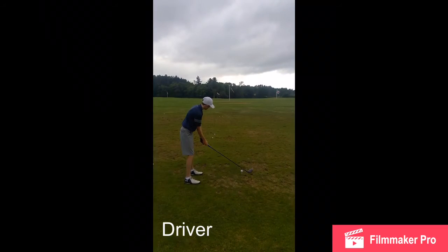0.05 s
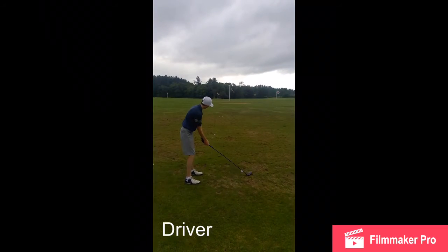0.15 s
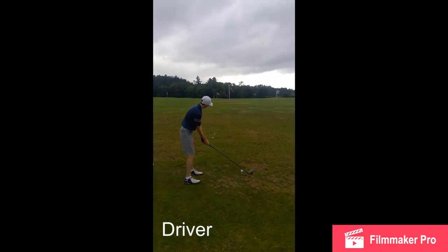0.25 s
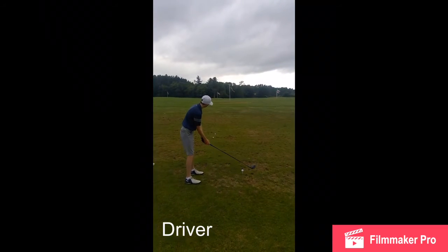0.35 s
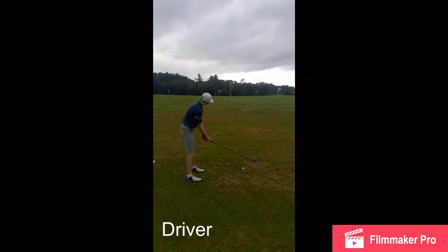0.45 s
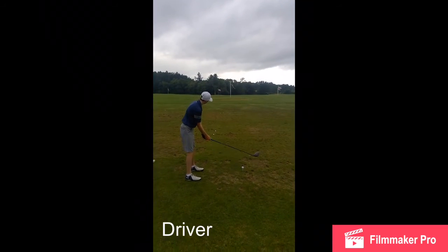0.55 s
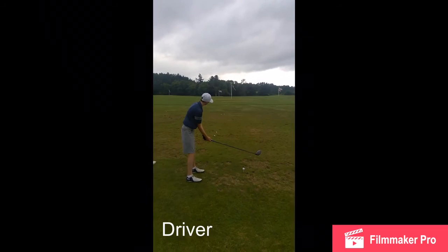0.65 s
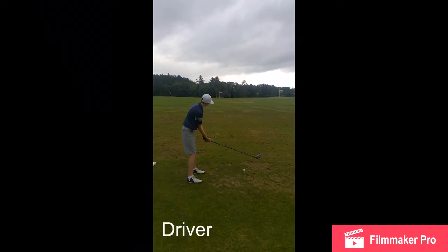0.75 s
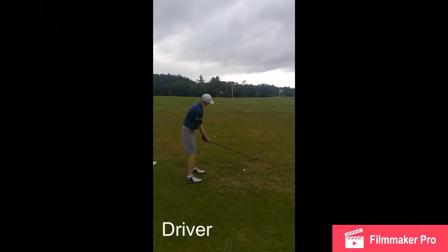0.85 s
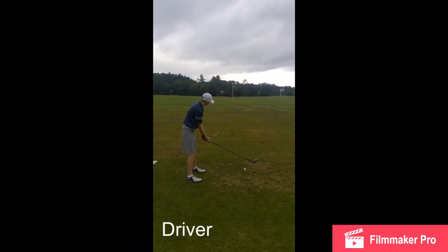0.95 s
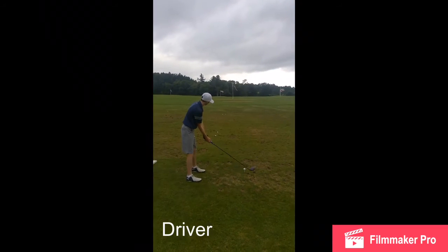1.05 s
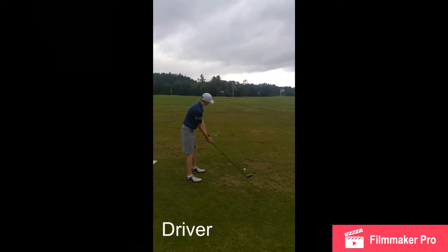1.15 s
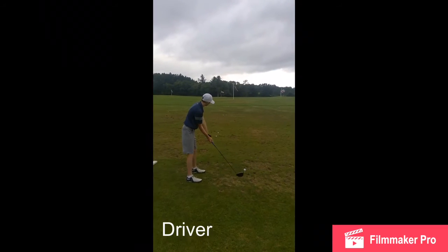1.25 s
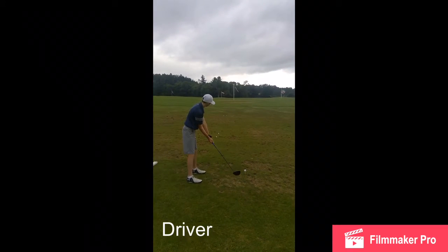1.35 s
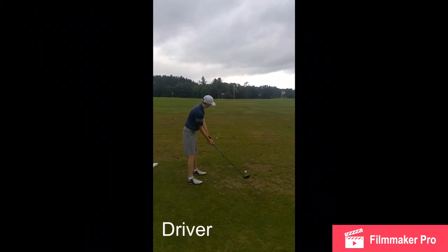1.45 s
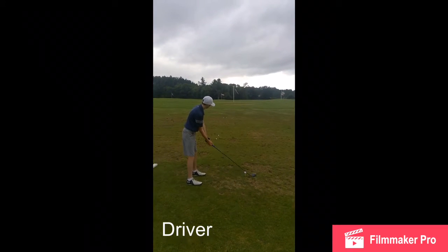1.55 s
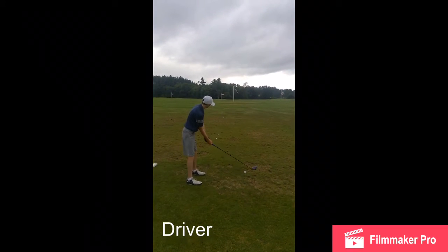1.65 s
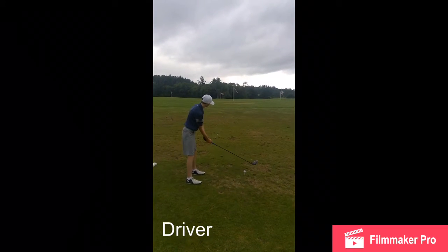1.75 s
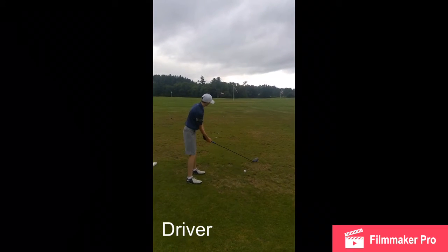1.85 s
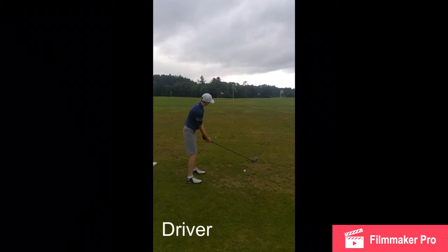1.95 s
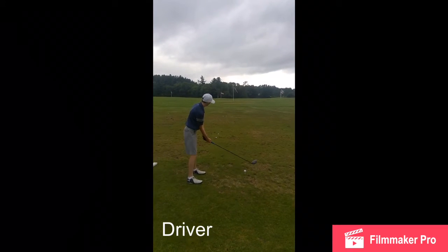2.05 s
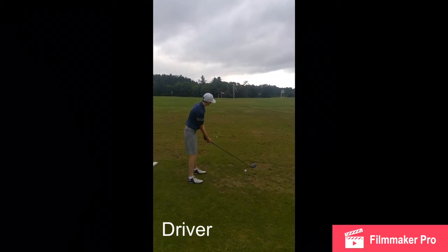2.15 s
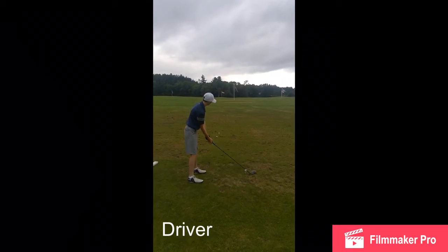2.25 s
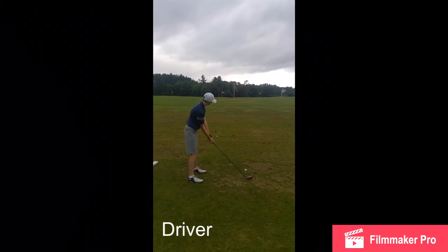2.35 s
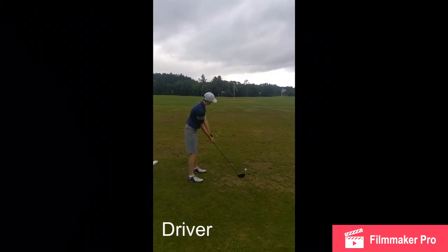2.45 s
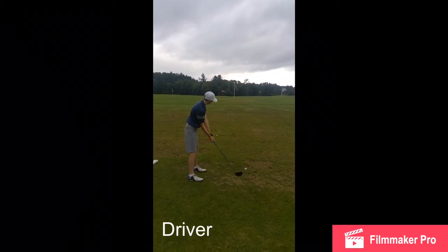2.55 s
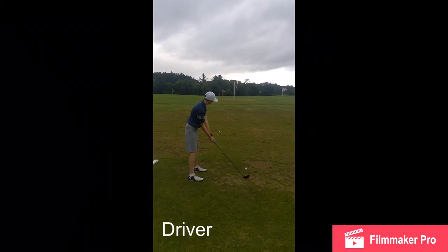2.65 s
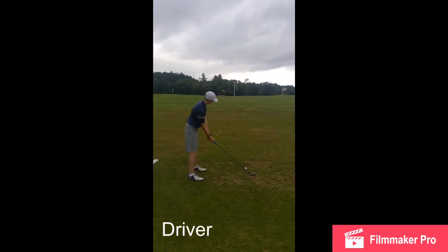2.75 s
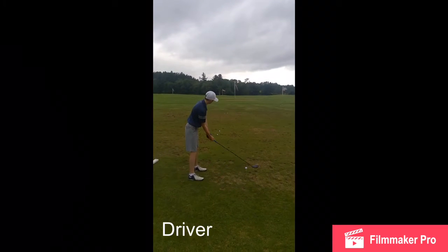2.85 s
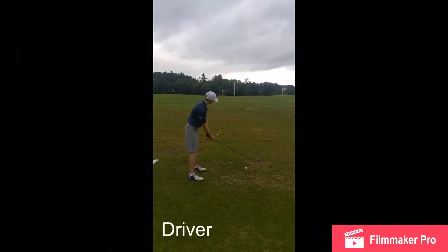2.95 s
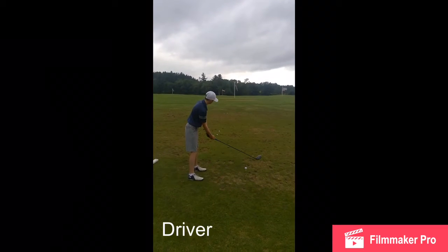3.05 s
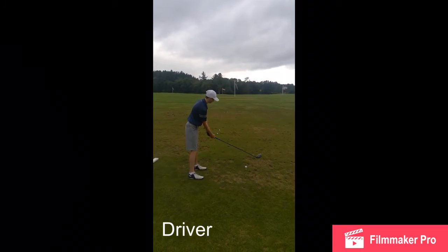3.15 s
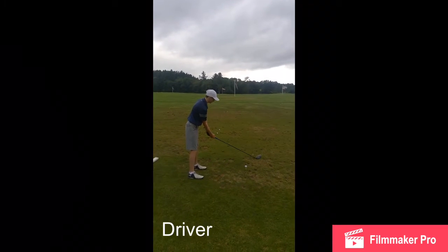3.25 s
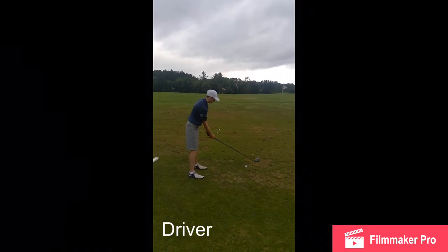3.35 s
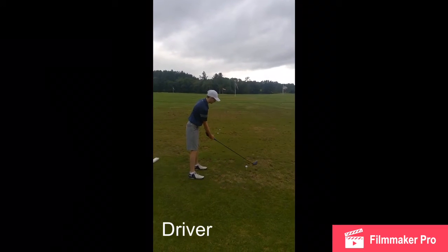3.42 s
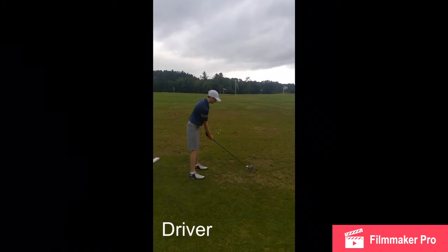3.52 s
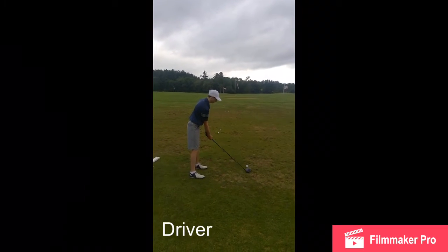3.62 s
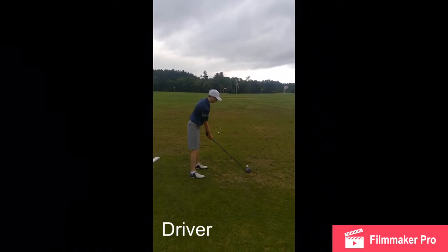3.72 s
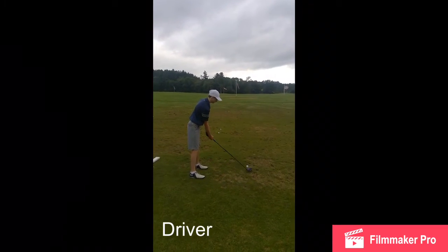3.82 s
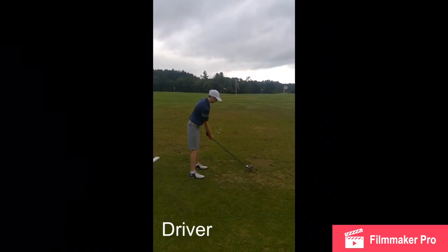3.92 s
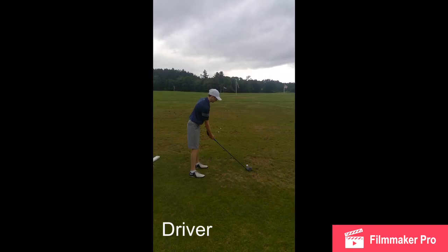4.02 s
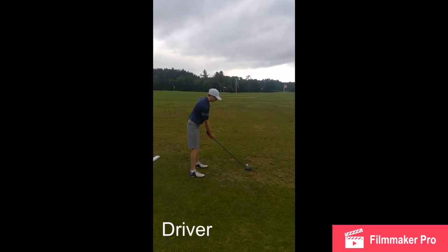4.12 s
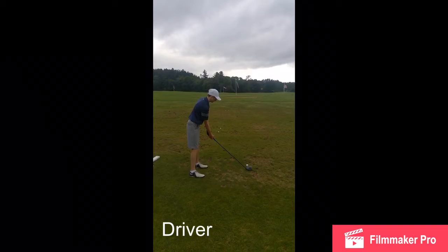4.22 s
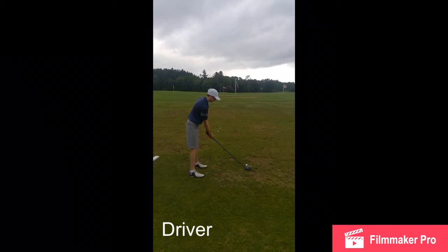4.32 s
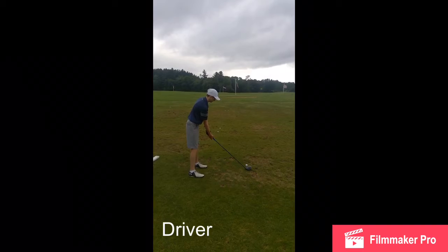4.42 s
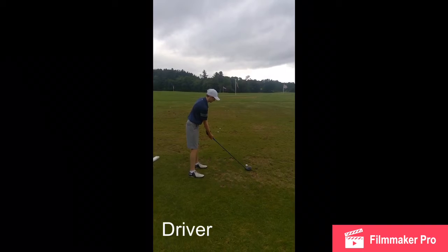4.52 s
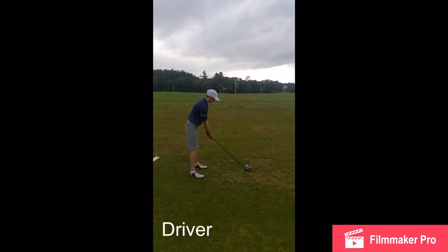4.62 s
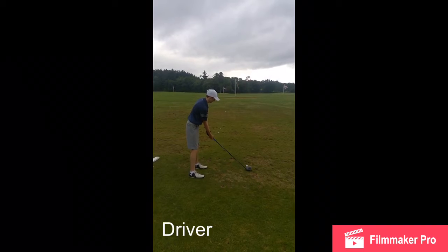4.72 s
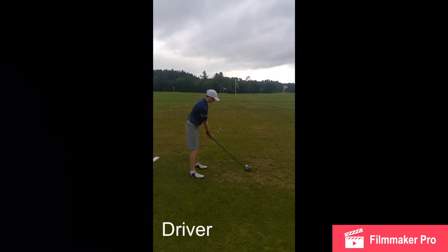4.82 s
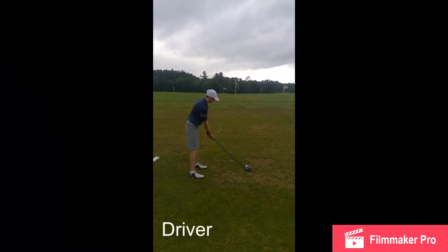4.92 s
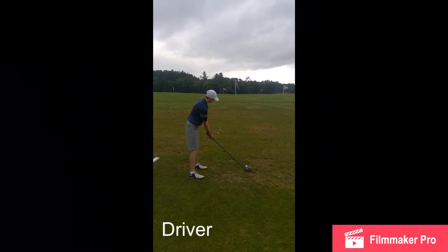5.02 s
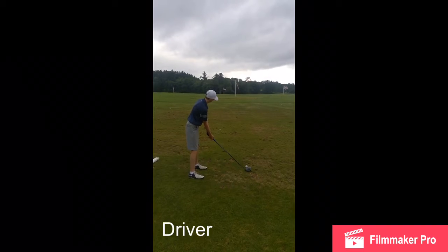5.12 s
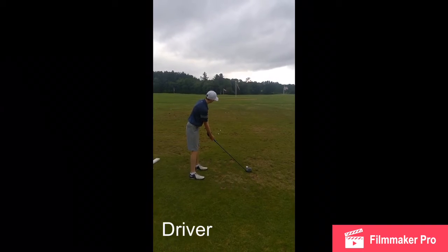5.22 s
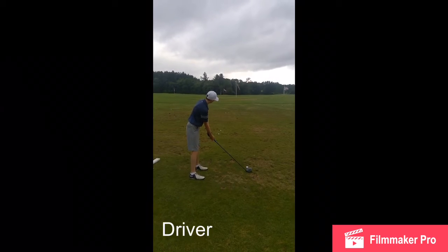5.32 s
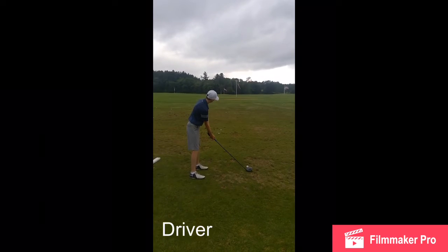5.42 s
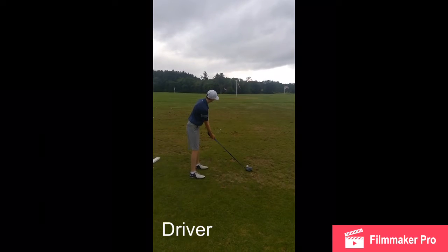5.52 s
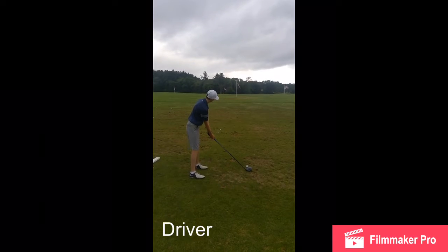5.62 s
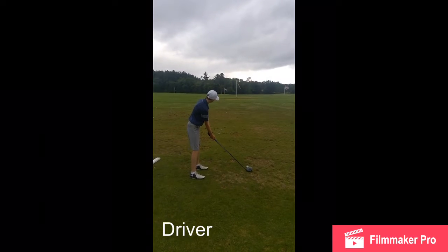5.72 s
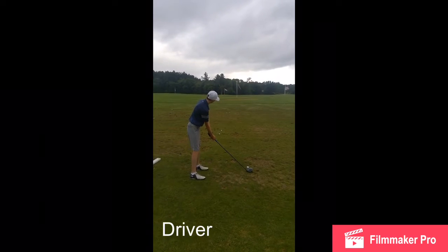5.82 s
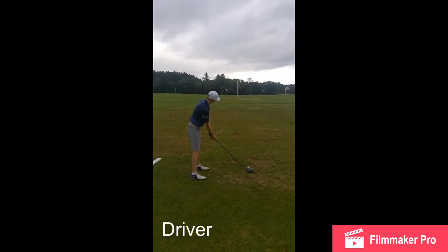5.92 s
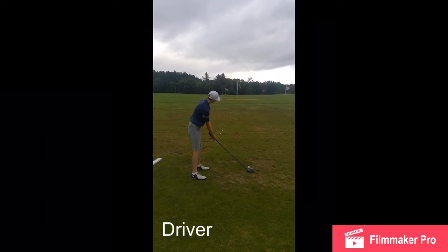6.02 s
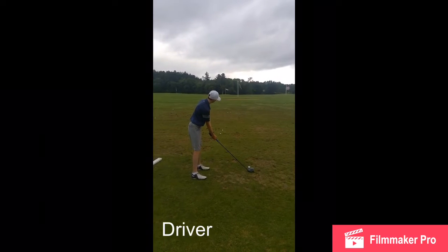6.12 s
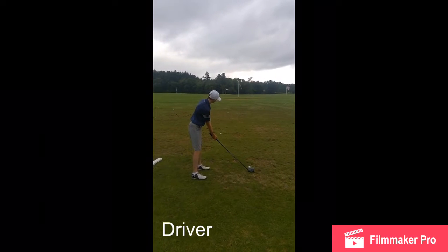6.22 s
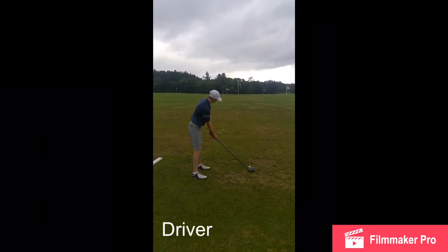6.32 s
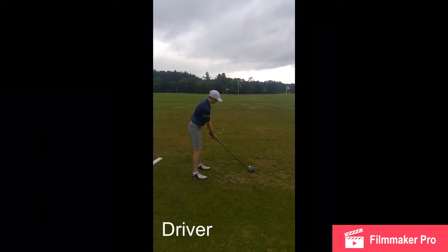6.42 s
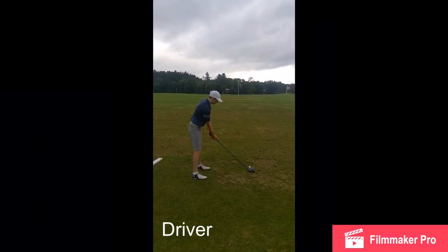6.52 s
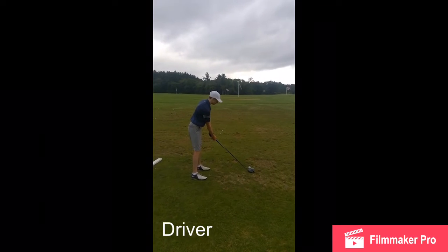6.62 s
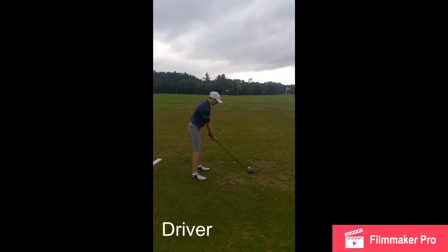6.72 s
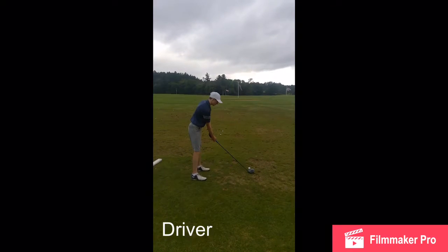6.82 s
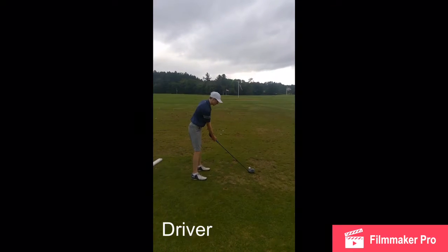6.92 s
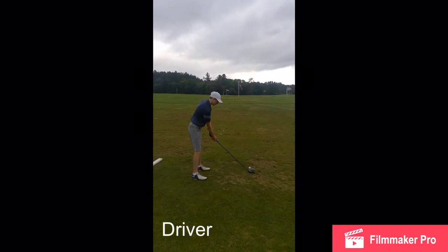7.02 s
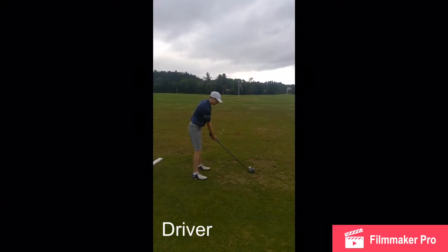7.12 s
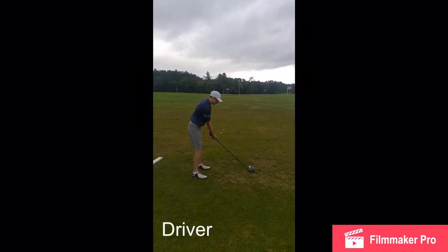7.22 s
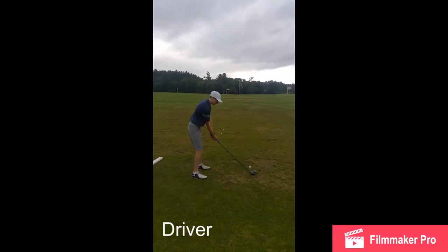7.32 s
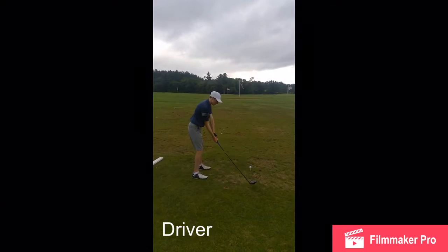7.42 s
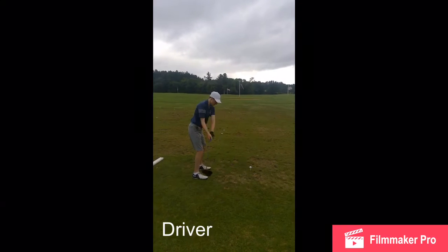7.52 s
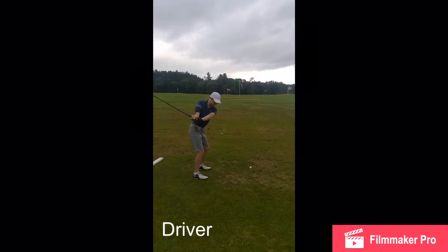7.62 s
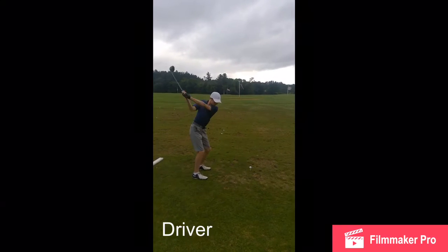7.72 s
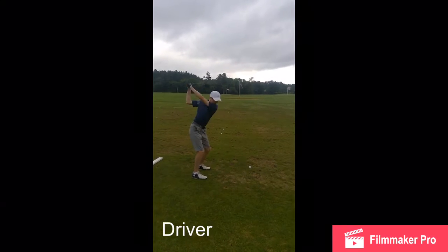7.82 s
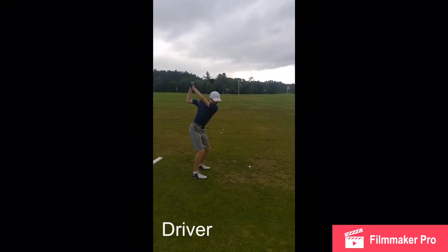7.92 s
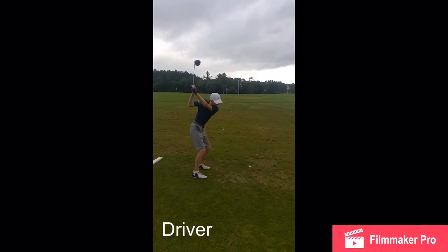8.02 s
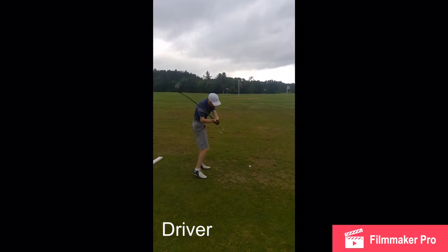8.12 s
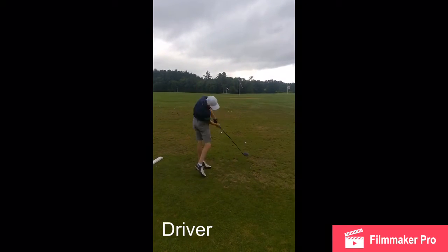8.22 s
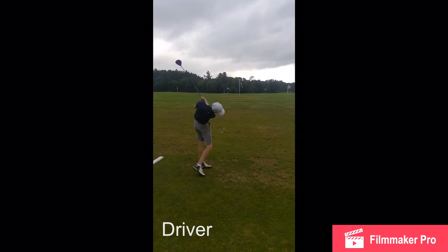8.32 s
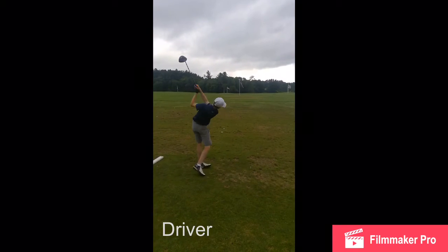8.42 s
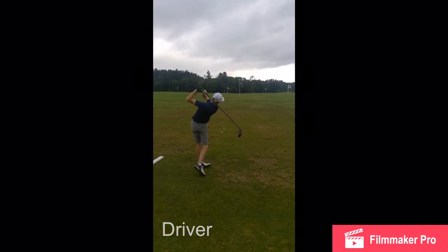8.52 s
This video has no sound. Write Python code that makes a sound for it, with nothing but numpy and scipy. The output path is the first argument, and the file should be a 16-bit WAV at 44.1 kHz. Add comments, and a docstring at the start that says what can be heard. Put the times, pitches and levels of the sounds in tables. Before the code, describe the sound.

A low wash of far traffic and light wind lies under scattered bird chirps and one longer whistle on an open golf range. Faint club clicks come from other bays, along with slight rustles and dull turf thuds. After about eight quiet seconds comes a fast swish and a single ringing, metallic crack as a driver strikes the ball, close enough to slightly overload the microphone, followed by a brief echo.

```python
"""A quiet golf practice range. Over distant traffic and a faint breeze, small birds call from the trees.
Clubs click in other bays, gloves and grass rustle, a hand bumps the microphone, and the turf takes dull
knocks. One bird gives a long whistle. Near 8.2 s a driver swishes down, shedding eddies, and cracks the
ball; the modes of its hollow metal head ring and the peaks overload the microphone. A wall to the left
returns an echo, and the scattered sound dies away over the field."""
import sys
import numpy as np
from scipy import signal
from scipy.fft import rfft, irfft, next_fast_len
from scipy.io import wavfile

SR = 44100
rng = np.random.default_rng(int(sys.argv[2]) if len(sys.argv) > 2 else 0)


def wav_record(signal):
    """Record a signal, one row per channel, as 16-bit PCM in the file named by sys.argv[1]."""
    frames = np.transpose(np.atleast_2d(signal))
    bounded = np.clip(frames, -1, 1)
    # unit amplitude maps onto the largest positive 16-bit level
    quanta = np.round(bounded * 32767).astype(np.int16)
    wavfile.write(sys.argv[1], SR, quanta)


N = 377496
TIME = np.arange(N) / SR
STRIKE_S, WALL_DELAY_S = 8.2044, .0512

# Pan is left level minus right; t60 is the time to decay by 60 dB. Spectra give relative levels.
# A flat spectrum. Each row: frequency in Hz, level in dB.
WHITE = [(1, 0), (SR, 0)]
# Likeness of diffuse sound at the two microphone ports. Each row: frequency in Hz, coherence.
COHERENCE = [(40, 0.63), (130, 1), (290, 0.93), (640, 0.69), (1400, .35), (3100, 0.079), (15000, 0.014)]
# Spectrum of distant traffic and air. Each row: frequency in Hz, level in dB.
TRAFFIC_SPECTRUM = [(15, -3), (40, -0.5), (80, -3), (105, -10.5), (200, -15.5), (280, -23.5), (420, -26),
                    (620, -32), (950, -29.5), (1600, -34.5), (4200, -38.5), (7000, -46.5), (11000, -50.5),
                    (15000, -55.5)]
# Spells of buffeting at the ports. Each row: start in seconds, hold in seconds, level in dB, pan in dB.
BUFFETS = [(1.462, 0.022, -60, 1), (1.54, .11, -56, 3.5), (1.84, 0.032, -68, -6), (2.021, 0.1, -45.5, -29),
           (5.396, .04, -64, 4), (5.539, 0.25, -69.5, -0.5), (8.164, 0.3, -51, 1.5)]
# Spectrum of the buffeting. Each row: frequency in Hz, level in dB.
BUFFET_SPECTRUM = [(15, -5.5), (40, 5), (90, 2.5), (160, -10), (260, -21.5), (500, -35.5), (1500, -67.5)]
# Slurred bird notes, and the long whistle's faint upper tone. Each row: start in seconds, length in
# seconds, first and last pitch in Hz, level in dB, pan in dB, rasp as a share of pitch.
SLURRED_NOTES = [(0.908, .05, 4850, 5010, -83, 9, .005), (1.784, 0.031, 4730, 4250, -60.5, -4, .011),
                 (2.151, 0.1, 4180, 4420, -69, 11.5, 0.0052), (2.296, .11, 1700, 1710, -72, 3, 0.024),
                 (2.522, .43, 11400, 11700, -89, -1, 0.0022), (2.372, 0.076, 3480, 3220, -53, 19.5, 0.028),
                 (2.393, .06, 5080, 5120, -69, 20, 0.0074), (2.406, .05, 3000, 2620, -67, 11, 0.032),
                 (2.685, 0.071, 1515, 1567, -68.5, -10, 0.011), (2.733, 0.017, 6200, 6170, -71, -2, 0.0091),
                 (2.771, 0.074, 1740, 1806, -79.5, 2.5, 0.017), (3, 0.01, 3540, 3470, -72, 3, 0.0087),
                 (3.344, 0.018, 1510, 1577, -74.5, -0.5, .012),
                 (3.654, 0.014, 1597, 1550, -72.5, 3.5, .012),
                 (4.066, 0.023, 5050, 5040, -68.5, 21, 0.0076), (4.342, 0.036, 4750, 4950, -63, 23, .015),
                 (4.667, 0.01, 3600, 3540, -56.5, 17.5, .008), (4.664, 0.017, 5700, 5560, -68, 11, .009),
                 (4.725, 0.046, 3880, 4120, -60.5, 25, 0.011), (4.729, 0.046, 4350, 4760, -57, 22, 0.025),
                 (4.734, .07, 1727, 1597, -72.5, 13, .023), (4.75, .085, 3362, 2973, -50, 13, 0.034),
                 (4.83, 0.043, 2850, 2660, -67, 11.5, 0.022),
                 (5.151, 0.073, 2950, 2804, -83.5, 8.5, 0.0075), (5.422, .12, 4000, 3260, -84.5, 12, .01),
                 (5.445, .085, 3170, 2910, -80, 12, 0.0086), (5.736, 0.089, 3130, 2720, -77, 9, .01),
                 (5.888, 0.04, 3050, 2880, -79, 8, .012), (5.981, 0.041, 3470, 3250, -77, 10.5, 0.0073),
                 (6.032, 0.043, 2920, 2650, -82.5, 9, .012), (6.441, 0.02, 4600, 4550, -55, 8, 0.0069),
                 (6.622, 0.095, 1682, 1473, -75, 0, 0.024), (6.68, 0.14, 6060, 6650, -85.5, -14, .004),
                 (7.009, 0.052, 5020, 4930, -69.5, 21, 0.011), (7.083, 0.036, 1114, 1230, -70.5, 4.5, .024),
                 (7.221, 0.045, 1890, 1550, -63, 3, .012), (7.366, 0.068, 3580, 3030, -79.5, 7.5, 0.019),
                 (7.773, .06, 3500, 3290, -81, 6, 0.017), (7.758, 0.059, 1447, 1690, -69.5, -7.5, .029)]
# The near bird's calls. Each row: start in seconds, level in dB, pitch ratio, second syllable's gain in dB.
NEAR_CALLS = [(1.101, -47, 0.98, 0.5), (2.221, -41.5, 1.005, -8.5), (4.364, -48.5, 1, -9),
              (6.309, -48.5, 1.007, -7)]
# The two syllables of a call. Each row: delay in seconds, length in seconds, pitch ratio.
CALL_SYLLABLES = [(0, .072, 1), (.074, .058, .825)]
# A syllable rises, flicks up and falls. Each row: share of its length, base pitch in Hz, gain in dB.
SYLLABLE_CONTOUR = [(0, 3526, -2), (.28, 3986, -1.5), (.46, 4057, -2), (.52, 4620, -8), (.56, 4680, -6.5),
                    (.61, 3780, -2.5), (.8, 3516, -6), (1, 3250, -8)]
# Club and ball contacts in other bays. Each row: start in seconds, relative level in dB, resonance in Hz,
# relative level of the noisy edge in dB, t60 in seconds, pan in dB.
BAY_CLICKS = [(1.4481, -30.5, 900, -13, 0.0065, -11), (1.449, -45.5, 378, -24.5, .07, -1),
              (1.451, -31, 1230, 2, 0.016, -8), (1.4515, -38.5, 720, -15, 0.02, 2),
              (1.4605, -52.5, 2060, 3, 0.016, -1), (1.484, -52, 1340, -8, 0.048, 15),
              (1.509, -29, 1370, -0.5, 0.013, -1), (1.5098, -34, 7070, 8, 0.01, -4),
              (1.5436, -45, 1450, -9.5, .015, 18), (2.004, -35, 1140, -10.5, 0.0019, -20.5),
              (2.026, -50.5, 1180, -4, 0.0038, -12.5), (3.096, -50.5, 2360, 8.5, 0.029, -8.5),
              (3.659, -54.5, 12700, 7, 0.022, -12), (4.572, -54.5, 12690, 10.5, 0.03, -14),
              (5.74, -60.5, 11880, 0.5, 0.038, -12), (5.78, -65, 7600, 6.5, 0.029, -17),
              (5.801, -67, 2340, -8, 0.055, -11)]
# Spectrum of a click's hard edge. Each row: frequency in Hz, level in dB.
EDGE_SPECTRUM = [(200, -13), (1000, -11), (2200, -5.5), (3400, 3.5), (5500, -3.5), (8000, 0),
                 (11000, -10.5), (15000, -16.5)]
# Rustles of gloves and grass. Each row: start in seconds, length in seconds, level in dB.
RUSTLE_SPELLS = [(1.929, 0.042, -77), (3.558, 0.14, -73), (4.562, .035, -77), (5.729, 0.085, -80),
                 (6.627, 0.022, -79.5), (7.313, .02, -83)]
# Spectrum of one snap in a rustle. Each row: frequency in Hz, level in dB.
SNAP_SPECTRUM = [(2000, -35), (5000, -17), (7200, -1), (9000, -10), (12600, 0), (15000, -7)]
# Finger bumps. Each row: centre in seconds, level in dB, frequency in Hz, half width in seconds, pan in dB.
CASE_BUMPS = [(2.016, -38, 141.5, 0.0098, -30.5), (5.2448, -41, 235, 0.0052, -33.5),
              (5.421, -44, 55, 0.0028, 25), (7.129, -36.5, 193, 0.0036, 29.5)]
# Feet and clubs on turf. Each row: start in seconds, peak in dB, cutoff in Hz, t60 in seconds.
TURF_KNOCKS = [(3.564, -62, 960, 0.15), (4.109, -53, 990, 0.12), (4.754, -54.5, 337, 0.068),
               (5.46, -68, 903, 0.1)]
# Buzzy bird calls. Each row: start in seconds, length in seconds, level in dB.
BUZZ_CALLS = [(3.937, 0.12, -69), (7.001, 0.11, -77)]
# Spectrum of the turbulence behind the swinging head. Each row: frequency in Hz, level in dB.
TURBULENCE_SPECTRUM = [(60, -3), (150, 1), (380, -1), (550, -1), (1100, -10), (1650, -12), (2200, -20),
                       (4500, -20), (9000, -26), (15000, -28.5)]
# Spectrum of the ball's crack and the head's dense upper modes. Each row: frequency in Hz, level in dB.
CRACK_SPECTRUM = [(60, -24.5), (200, -6), (480, -2), (700, 0), (1100, -2.5), (1600, -1.5), (2200, -10.5),
                  (3200, -5), (4500, -1), (6000, -3), (9000, -9), (11000, -14.5), (15500, -12)]
# Decay of the crack. Each row: frequency in Hz, t60 in seconds.
CRACK_DECAY = [(200, 0.027), (1500, 0.023), (6000, 0.041), (15000, 0.051)]
# Direction of the crack. Each row: frequency in Hz, pan in dB.
CRACK_BALANCE = [(100, -1), (350, 3), (1300, 14), (2500, 7), (3500, -2.5), (8000, -5), (15000, 0)]
# Short low tones that colour the strike's clunk. Each row: frequency in Hz, level in dB, t60 in seconds,
# pan in dB.
CLUNK_TONES = [(374, -14, 0.025, 5), (508, -25.5, 0.012, 4), (640, -17.5, 0.023, 1.5),
               (800, -9.5, 0.022, 12.5), (1062, -20.5, 0.035, 21), (1430, -20, 0.035, 14),
               (1670, -20.5, 0.029, 13.5), (2570, -11.5, 0.021, 3)]
# Modes of the hollow head. Each row: frequency in Hz, relative level in dB, t60 in seconds before
# added damping, pan in dB.
HEAD_MODES = [(3210, -34, .06, 6), (4000, -10.5, 0.091, -15), (4150, -23, .08, 0), (4660, -14, 0.032, 1.5),
              (4872, -35, .12, -2.5), (5556, -10, 0.05, -11.5), (5700, -16, 0.059, 3.5),
              (6020, -10, 0.076, -1), (6040, -12.5, 0.11, -5), (6330, -18, 0.087, 1),
              (6860, -23, .06, -6.5), (6800, -15.5, .05, -1.5), (7483, -25, .07, -5.5),
              (7850, -13, 0.06, -5), (8199, -19.5, 0.078, -2.5), (8936, -31, .08, -8),
              (12900, -33, .04, -4.5)]
# Spectrum of the crack as wall and trees scatter it. Each row: frequency in Hz, level in dB.
SCATTER_SPECTRUM = [(80, -13), (190, -21), (330, -18.5), (500, -18.5), (800, -16.5), (1300, -14),
                    (2000, -15), (2900, -25.5), (4000, -24), (4700, -19), (5100, -20.5), (5500, -14.5),
                    (6400, -15.5), (7400, -20.5), (10000, -26.5), (15000, -29)]
# Decay of the scattered sound. Each row: frequency in Hz, t60 in seconds.
SCATTER_DECAY = [(100, 0.47), (1000, 0.48), (2800, 0.3), (4500, 0.5), (8000, 0.46), (15000, 0.34)]
# Direction of the scattered sound. Each row: frequency in Hz, pan in dB.
SCATTER_BALANCE = [(200, -1.5), (700, 0.5), (1300, 3.5), (2400, 4.5), (4400, 10), (14000, 11)]
# How well the head's ring carries to the trees. Each row: frequency in Hz, gain in dB.
RING_TRANSFER = [(3200, -11), (4000, 5.5), (4300, -6), (4700, 2.5), (5100, -7), (5500, -9), (6100, 0.5),
                 (7000, -8), (13000, -11.5)]


def from_db(db):
    """Amplitude grows tenfold with every 20 dB."""
    return 10 ** (np.asarray(db) / 20)


def unit_rms(x):
    """Normalisation to unit mean power."""
    return x / np.sqrt(np.mean(x ** 2) + 1e-20)


def at_hz(points, hz):
    """Interpolation on a logarithmic frequency axis."""
    f, value = np.transpose(points)
    return np.interp(np.log(np.maximum(hz, 1)), np.log(f), value)


def panned(pan_db):
    """A level difference at constant total power gives direction."""
    gains = from_db(np.array([[1], [-1]]) * pan_db / 2)
    return gains / np.sqrt(np.mean(gains ** 2, axis=0))


def add(out, s, sound):
    """Superposition of a sound from s seconds on."""
    i = round(s * SR)
    out[:, i:i + sound.shape[-1]] += sound[..., :N - i]


def lowpass(x, hz, order=2):
    """A Butterworth filter attenuates above its cutoff."""
    return signal.sosfilt(signal.butter(order, hz, fs=SR, output="sos"), x)


def highpass(x, hz, order=2):
    """A Butterworth filter attenuates below its cutoff."""
    return signal.sosfilt(signal.butter(order, hz, "high", fs=SR, output="sos"), x)


def drift(per_s):
    """Random modulation: straight lines join Gaussian values."""
    knots = rng.standard_normal(N // 16)
    return np.interp(TIME * per_s, np.arange(len(knots)), knots)


def noise(spectrum, size=N, coherence=COHERENCE):
    """Partly coherent stereo noise of unit rms, from independent mid and side signals."""
    fast = next_fast_len(size)
    hz = np.arange(fast // 2 + 1) * SR / fast
    mid, side = rfft(rng.standard_normal((2, fast)))
    alike = np.clip(at_hz(coherence, hz), -1, 1)
    both = np.sqrt(1 + alike) * mid + np.sqrt(1 - alike) * side * [[1], [-1]]
    return unit_rms(irfft(both * from_db(at_hz(spectrum, hz)), fast)[:, :size])


def damped(x, t60s):
    """Frequency-dependent damping: each octave decays at its own rate."""
    size = x.shape[-1]
    t, hz = TIME[:size], np.arange(size // 2 + 1) * SR / size
    octave, spectrum = np.log2(np.clip(hz, 125, 16000) / 125), rfft(x)
    bands = [irfft(spectrum * np.maximum(1 - abs(octave - k), 0), size) for k in range(8)]
    return sum(band * from_db(-60 * t / at_hz(t60s, 125 * 2 ** k)) for k, band in enumerate(bands))


def coloured(x, spectrum, pans):
    """Linear filtering gives each frequency a gain and a direction."""
    hz = np.linspace(0, SR / 2, x.shape[-1] // 2 + 1)
    return irfft(rfft(x) * from_db(at_hz(spectrum, hz)) * panned(at_hz(pans, hz)), x.shape[-1])


def convolved(x, response):
    """Convolution with a stereo impulse response."""
    return signal.oaconvolve(np.atleast_2d(x), response, axes=1)[:, :N]


def oscillation(hz):
    """A sine whose phase is the integral of its frequency."""
    return np.sin(2 * np.pi * np.cumsum(hz) / SR)


def traffic(hum_hz=74.6, whine_hz=1000):
    """Far traffic and air give broadband noise, with an engine's wavering hum and a thin whine."""
    hum = oscillation(hum_hz + 2 * drift(per_s=5.1))
    whine = oscillation(whine_hz + 6 * drift(per_s=27.5))
    rumble = from_db(-68) * noise(TRAFFIC_SPECTRUM)
    return rumble + from_db(-72 + 1.3 * drift(per_s=11)) * hum + from_db(-95) * whine


def buffeting(breeze_db=-80, rise_db_per_s=349.5, fall_db_per_s=226.5, lead_s=.25):
    """A breeze makes the pressure at the ports fluctuate; stronger spells rise, hold and fall."""
    flow = from_db(breeze_db) * panned(-5.5) * np.ones(N)
    since = TIME[:SR] - lead_s
    for s, hold_s, level_db, pan_db in BUFFETS:
        below_db = rise_db_per_s * np.maximum(-since, 0) + fall_db_per_s * np.maximum(since - hold_s, 0)
        add(flow, s - lead_s, from_db(level_db - below_db) * panned(pan_db))
    return flow * noise(BUFFET_SPECTRUM, coherence=[(20, .2), (500, .26)])


def bird_tone(hz, waver):
    """Slight random frequency modulation broadens a bird's near-pure tone."""
    wobble = unit_rms(lowpass(rng.standard_normal(len(hz)), 150))
    return oscillation(hz * (1 + waver * wobble))


def slur(length_s, start_hz, end_hz, waver):
    """A linear frequency glide swells and fades under a half-sine envelope."""
    u = np.linspace(0, 1, round(length_s * SR))
    return np.sin(np.pi * u) * bird_tone(start_hz + (end_hz - start_hz) * u, waver)


def twitter(per_s=5.5, level_db=-88, registers_hz=(1550, 4200, 5100, 7900, 8200)):
    """Far birds peep as a random process, each kind in its own register."""
    out, draws = np.zeros((2, N)), rng.random((90, 6))
    starts = np.cumsum(2 * draws[:, 0] / per_s)
    for s, (_, kind, length, slope, loud, side) in zip(starts, draws):
        if s < TIME[-1]:
            hz, glide_hz = registers_hz[int(kind * 5)], 700 * (slope - .5)
            peep = slur(.014 + .02 * length, hz + glide_hz, hz - glide_hz, waver=.022)
            add(out, s, from_db(level_db + 10 * loud - 7.5) * panned(16 * (side - .4)) * peep)
    return out


def woods(x, wet_db, t60, patchy_db=3, treble_ratio=.92, wet_pan_db=0):
    """Reverberation: trunks reflect in uneven clusters, and absorption by leaves shortens the treble."""
    clusters = from_db(patchy_db * drift(per_s=121)[:SR])
    wash = damped(noise(WHITE, SR), [(2000, t60), (8000, treble_ratio * t60)])
    onset = np.clip((TIME[:SR] - .008) / .0098, 0, 1)
    response = unit_rms(wash * clusters * onset) / np.sqrt(SR)
    return x + from_db(wet_db) * panned(wet_pan_db) * convolved(x, response)


def slurred_notes():
    """Frequency glides form short bird notes and the long whistle's faint upper tone."""
    out = np.zeros((2, N))
    for s, length_s, start_hz, end_hz, level_db, pan_db, rasp in SLURRED_NOTES:
        add(out, s, from_db(level_db) * panned(pan_db) * slur(length_s, start_hz, end_hz, rasp))
    return out


def near_bird(wheeze_s=.056, wheeze_hz=6604, wheeze_db=-79.5, edge_s=.014):
    """A bird on the left wheezes, then modulates pitch and level along one contour in two syllables."""
    out = np.zeros((2, N))
    share, shape_hz, shape_db = np.transpose(SYLLABLE_CONTOUR)
    for s, call_db, ratio, second_db in NEAR_CALLS:
        add(out, s - wheeze_s / 2, from_db(wheeze_db) * slur(wheeze_s, wheeze_hz, wheeze_hz, waver=.034))
        for k, (later_s, length_s, lower) in enumerate(CALL_SYLLABLES):
            u = np.linspace(0, 1, round(length_s * SR))
            edges = np.minimum(np.minimum(u, 1 - u) * length_s / edge_s, 1)
            envelope = edges * from_db(call_db + k * second_db + np.interp(u, share, shape_db))
            hz = np.interp(u, share, shape_hz) * ratio * lower
            add(out, s + later_s, envelope * bird_tone(hz, waver=.018))
    return woods(out * panned(14), wet_db=-4, t60=.5, patchy_db=3.5, treble_ratio=.35)


def clicks(edge_db=-4.5, attack_s=.00072):
    """Each impact excites one damped resonance and an edge of noise above it; small bodies lack lows."""
    t, out = TIME[:SR // 10], np.zeros((2, N))
    for s, level_db, hz, hard_db, t60, pan_db in BAY_CLICKS:
        grain = noise(EDGE_SPECTRUM, len(t), coherence=[(500, .59), (10000, .46)])
        edge = from_db(hard_db + edge_db) * highpass(grain, hz)
        body = .49 * np.sin(2 * np.pi * hz * t)
        envelope = 2 * from_db(level_db - 60 * t / t60) * np.minimum(t / attack_s, 1)
        add(out, s, envelope * panned(pan_db) * (edge + body))
    return out


def rustles(snaps_per_s=130, spread_db=4, snap_t60=.0086):
    """Shot noise: gloves and grass give short clumps of tiny random snaps."""
    t, envelope = TIME[:SR // 100], np.zeros((2, N))
    impulses = (rng.random(N) < snaps_per_s / SR) * from_db(spread_db * rng.standard_normal(N))
    snap = noise(SNAP_SPECTRUM, len(t)) * from_db(-60 * t / snap_t60)
    for s, length_s, level_db in RUSTLE_SPELLS:
        add(envelope, s, from_db(level_db) * np.sin(np.linspace(0, np.pi, round(length_s * SR))))
    return envelope * unit_rms(convolved(impulses, snap)) * panned(-8)


def bumps(lead_s=.05):
    """Structure-borne sound: a finger on the microphone's case sends a low pulse, mostly to one port."""
    t, out = TIME[:SR // 10] - lead_s, np.zeros((2, N))
    for s, level_db, hz, half_s, pan_db in CASE_BUMPS:
        pulse = np.exp(-(t / half_s) ** 2) * np.cos(2 * np.pi * hz * t)
        add(out, s - lead_s, from_db(level_db) * panned(pan_db) * pulse)
    return out


def knocks(rebound_s=.028, loss_db=1, dulling=.57):
    """A soft impact lacks treble: turf dulls each blow, and its two rebounds are weaker and duller."""
    t, out = TIME[:SR // 4], np.zeros((2, N))
    for s, level_db, hz, t60 in TURF_KNOCKS:
        for k in range(3):
            burst = rng.standard_normal(len(t)) * from_db(-60 * t / t60)
            thud = lowpass(burst, hz * dulling ** k, order=6)
            add(out, s + k * rebound_s, from_db(level_db - k * loss_db) * thud / np.abs(thud).max())
    return out


def buzzes(pitch_hz=5030, trill_hz=378, depth_hz=230, stumble_hz=210, stumble_db=4):
    """Fast frequency modulation turns a far bird's tone into a buzz; pitch and level stumble at random."""
    out = np.zeros((2, N))
    for s, length_s, level_db in BUZZ_CALLS:
        t = TIME[:round(length_s * SR)]
        hz = pitch_hz + stumble_hz * drift(per_s=260)[:len(t)]
        gain = from_db(level_db + stumble_db * drift(per_s=260)[:len(t)])
        buzz = bird_tone(hz + depth_hz * np.sin(2 * np.pi * trill_hz * t), waver=.014)
        add(out, s, gain * panned(22) * np.sqrt(np.sin(np.pi * t / length_s)) * buzz)
    return out


def whistler(start_s=6.47, length_s=.345, peak_s=.298, half_width_s=.08, fade_s=.023):
    """Frequency and amplitude rise together with effort in the whistle of a bird on the right."""
    t, out = TIME[:round(length_s * SR)], np.zeros((2, N))
    effort = 1 / (1 + ((t - peak_s) / half_width_s) ** 2)
    hz, level_db = 3717 + 650 * effort, -69 + 11.5 * effort
    edges = np.minimum(np.minimum(t, length_s - t) / fade_s, 1)
    add(out, start_s, edges * from_db(level_db) * panned(-18.5) * bird_tone(hz, waver=.003))
    return woods(out, wet_db=-14, t60=.44)


def swish(fastest_s=8.192, half_width_s=.13, top_eddy_hz=836):
    """Vortex shedding: the shaft's tone rises in proportion to speed; the head adds broad turbulence."""
    since, out = TIME[:SR] - .5, np.zeros((2, N))
    speed = np.exp(-(since / half_width_s) ** 2)   # share of top speed
    level_db = -36.5 - 98.5 * (1 - speed)
    eddies = unit_rms(lowpass(rng.standard_normal((2, SR)), hz=90))
    phase = 2 * np.pi * np.cumsum(top_eddy_hz * speed) / SR
    tone = from_db(-3.5) * (eddies[0] * np.cos(phase) + eddies[1] * np.sin(phase))
    head_whistle = from_db(-53) * slur(.012, 3650, 3900, waver=.01)
    turbulence = from_db(-4) * noise(TURBULENCE_SPECTRUM, SR)
    pan_db = np.interp(since, [-.03, .02], [-5, 3])   # the club crosses from right to left
    add(out, fastest_s - .042, head_whistle)
    add(out, fastest_s - .5, from_db(level_db) * panned(pan_db) * (tone + turbulence))
    return out


def crack(burst_db=-2, contact_s=.00031, radiate_hz=260):
    """Impact flattens the ball in a pressure pulse, noise and a clunk; small bodies radiate little bass."""
    t, out = TIME[:SR // 4], np.zeros((2, N))
    contact = np.minimum(t / contact_s, 1)
    pulse = np.sin(np.pi * contact)
    grain = noise(WHITE, len(t), coherence=[(300, .29), (1200, -.25), (5000, .26), (12000, -.19)])
    grain = unit_rms(coloured(grain, CRACK_SPECTRUM, CRACK_BALANCE))
    burst = from_db(burst_db) * damped(grain, CRACK_DECAY)
    add(out, STRIKE_S, highpass(pulse + burst * contact, radiate_hz))
    for hz, level_db, t60, pan_db in CLUNK_TONES:
        add(out, STRIKE_S, from_db(level_db - 60 * t / t60) * panned(pan_db) * np.cos(2 * np.pi * hz * t))
    return out


def head_ring(pitch_ratio=1, gain_db=4.5, bloom_s=.0021, damping=1.38):
    """The hollow head's normal modes build up over a few milliseconds and decay exponentially."""
    t, out = TIME[:SR // 4], np.zeros((2, N))
    for hz, level_db, t60, pan_db in HEAD_MODES:
        phase = rng.uniform(0, 2 * np.pi) + np.array([[0], [1]]) * hz / 4500   # the ports lie apart
        envelope = from_db(gain_db + level_db - 60 * damping * t / t60) * (1 - np.exp(-t / bloom_s))
        add(out, STRIKE_S, envelope * panned(pan_db) * np.sin(2 * np.pi * hz * pitch_ratio * t + phase))
    return out


def scatter(spectrum, turf_db=-7, swell_db=-2, swell_s=.0083):
    """The field's impulse response: weak scatter from turf, a swell from the wall, a tail from trees."""
    t = TIME[:SR]
    turf = from_db(turf_db) * np.clip(t / .0092, 0, 1)
    after_wall = np.clip((t - WALL_DELAY_S) / .0052 + 1, 0, 1)
    swell = 1 + from_db(swell_db) * np.exp(-np.abs(t - WALL_DELAY_S - .01) / swell_s)
    wash = damped(coloured(noise(WHITE, SR), spectrum, SCATTER_BALANCE), SCATTER_DECAY)
    return wash * (turf * (1 - after_wall) + after_wall * swell)


def field_echoes(blow, doppler_ratio=1.008):
    """Reflection returns the crack as a wash and a dull slap, and the ring with a Doppler shift."""
    ring = head_ring(doppler_ratio).mean(axis=0)   # sharp, as the head flies towards the trees
    out = convolved(ring, scatter(RING_TRANSFER) / np.sqrt(SR))
    add(out, STRIKE_S, scatter(SCATTER_SPECTRUM))
    slap = highpass(lowpass(blow.mean(axis=0), 1450, order=3), 220, order=1)
    # the wall's slap and its ground bounce, a few milliseconds apart
    for later_s, slap_db in [(0, -10), (.0014, -11), (.0026, -15)]:
        add(out, WALL_DELAY_S + later_s, from_db(slap_db) * panned(19) * slap)
    return out


def scene():
    """The shot, the small sounds of the range, birds and traffic add by superposition."""
    blow = crack() + swish()
    shot = blow + head_ring() + field_echoes(blow)
    bays = woods(clicks() + rustles(), wet_db=-12.5, t60=.34, patchy_db=2, wet_pan_db=8)
    birds = near_bird() + whistler()
    chorus = woods(slurred_notes() + buzzes() + twitter(), wet_db=-6, t60=.37, treble_ratio=.68)
    return shot + bays + birds + chorus + knocks() + buffeting() + bumps() + traffic()


def record(dry, ceiling=.75, cutoff_hz=15800):
    """Saturation in the microphone rounds the strike's peaks; a steep low-pass cuts the top."""
    saturated = ceiling * np.tanh(dry / ceiling)
    return signal.sosfilt(signal.ellip(12, .1, 90, cutoff_hz, fs=SR, output="sos"), saturated)


dry = scene()
out = record(dry)
wav_record(out)
```